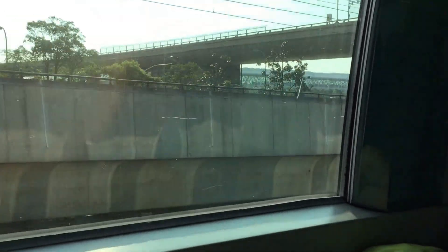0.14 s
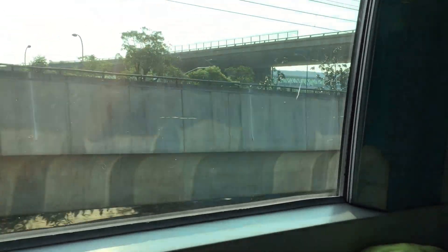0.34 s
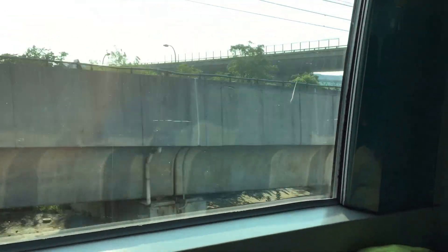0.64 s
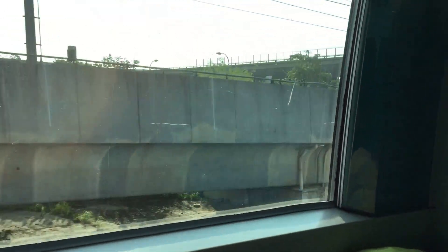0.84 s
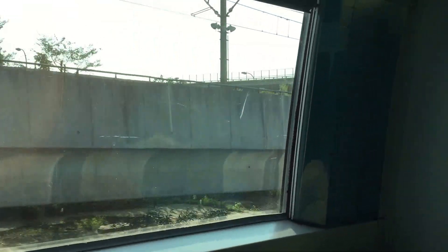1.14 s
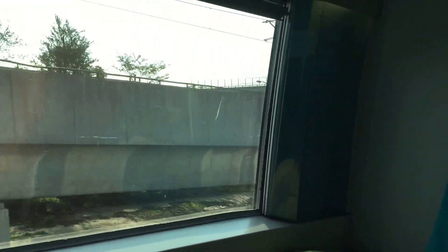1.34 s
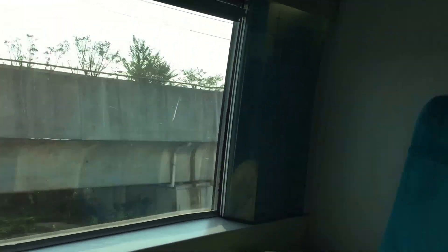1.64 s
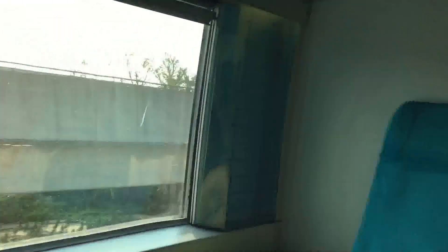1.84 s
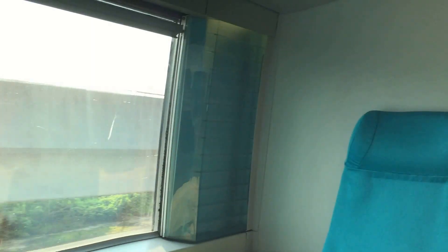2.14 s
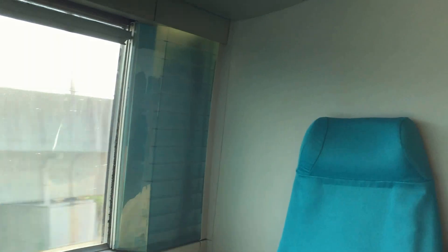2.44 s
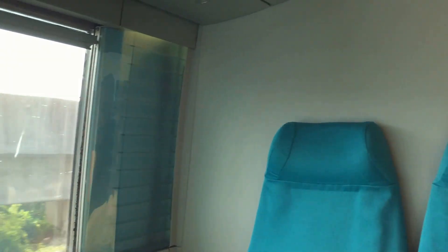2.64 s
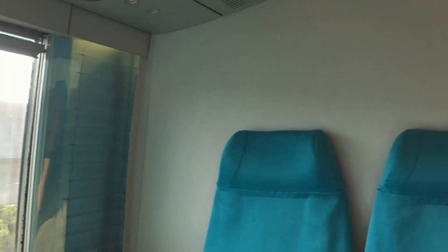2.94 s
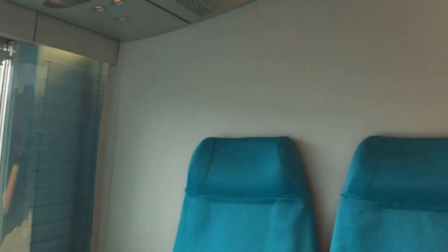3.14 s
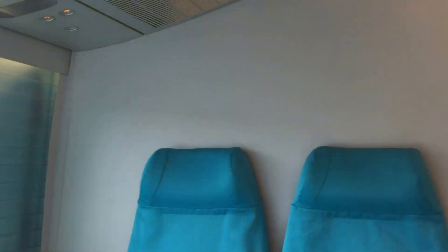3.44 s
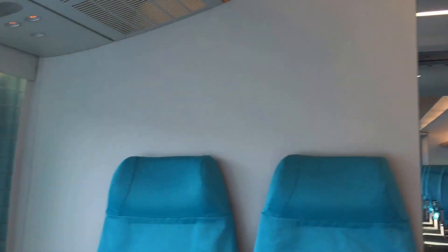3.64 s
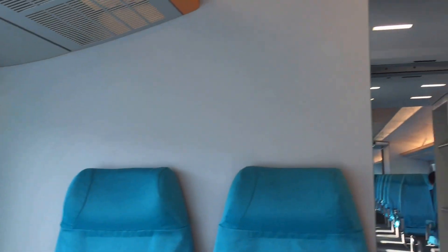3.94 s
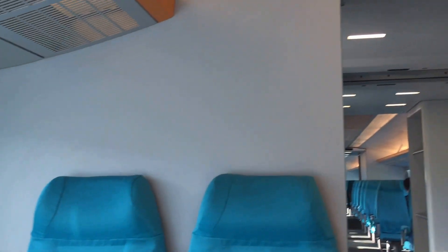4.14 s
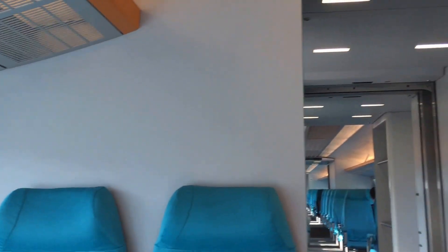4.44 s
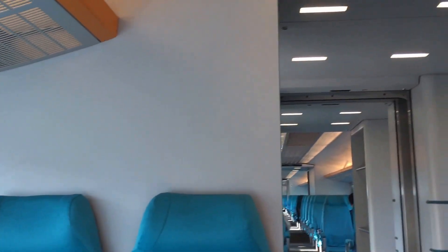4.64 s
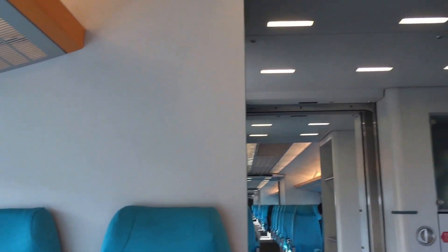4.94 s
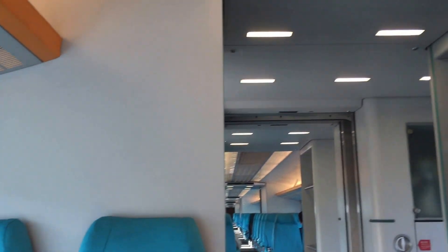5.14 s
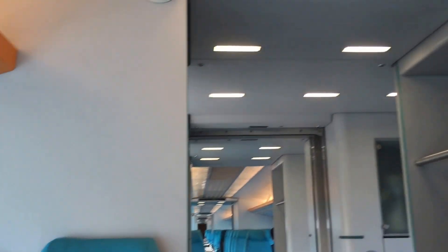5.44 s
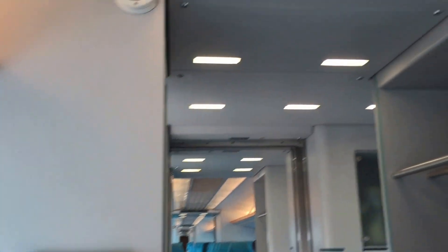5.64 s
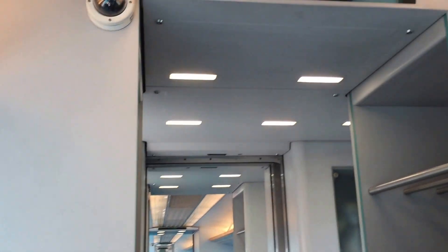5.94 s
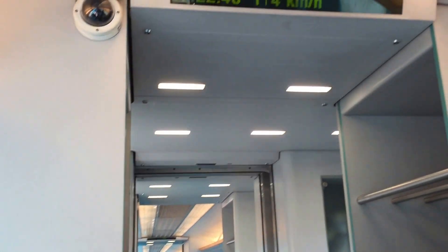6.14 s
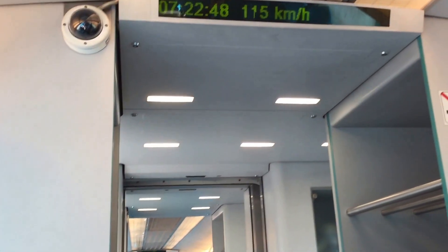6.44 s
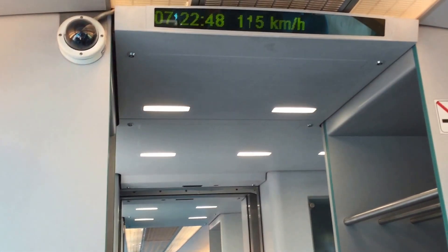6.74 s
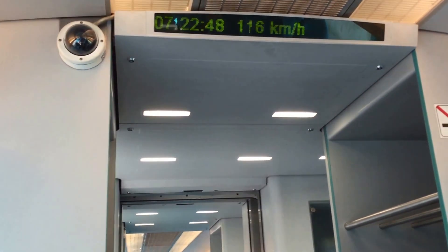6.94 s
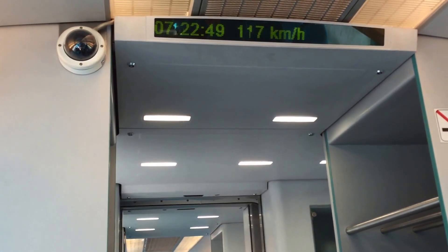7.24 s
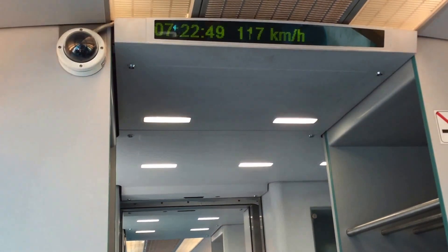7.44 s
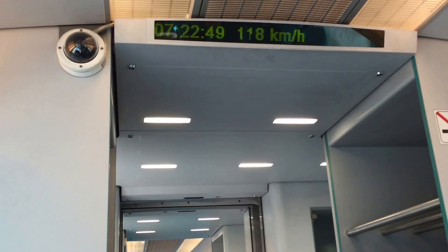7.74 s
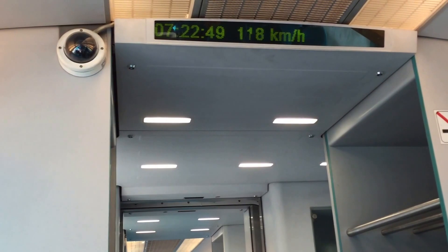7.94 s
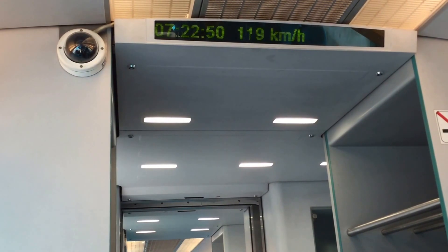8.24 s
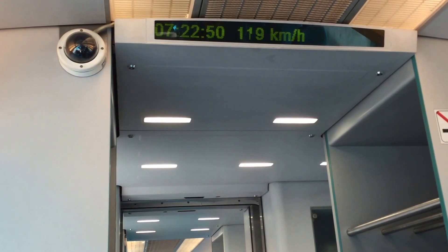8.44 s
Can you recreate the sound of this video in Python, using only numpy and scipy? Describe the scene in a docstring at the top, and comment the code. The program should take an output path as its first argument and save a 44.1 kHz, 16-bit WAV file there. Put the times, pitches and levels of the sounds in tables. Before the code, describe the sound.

Inside a fast train cabin, a steady low rumble and a slowly rising whine, with faint clicks and rattles from the trim.

```python
"""The motor of a magnetically levitated train whines as it gathers speed, heard inside the cabin.
The teeth of the track's motor winding pass under the magnets and make the whine; everything that
repeats along the track hums in step with the speed. The cabin's trim snaps, pings and rattles, and
something squeaks faintly. Behind it all are floor rumble, wall roar, air vents and a fan.
The tone changes slowly as a small microphone turns from the window to the aisle."""
import sys
import numpy as np
from scipy import signal
from scipy.fft import rfft, irfft
from scipy.io import wavfile
from scipy.ndimage import uniform_filter1d

SR = 44100
rng = np.random.default_rng(int(sys.argv[2]) if len(sys.argv) > 2 else 0)


def to_wav(sig):
    """Store sig (one row per channel, or 1-D mono) as 16-bit WAV at the path in sys.argv[1].

    Samples outside -1..1 are clipped; the rate is SR.
    """
    pcm = np.clip(np.atleast_2d(sig), -1, 1) * 32767
    pcm = np.round(pcm).astype(np.int16)
    wavfile.write(sys.argv[1], SR, pcm.T)  # frames by channels


N = 379260
T = np.arange(N) / SR

# How far the microphone has turned: time_s, turn_share (0 = window, 1 = aisle)
MIC_TURN = [(0, 0.06), (2.2, 0.24), (3.5, 0.6), (5.2, 0.74), (8.6, 0.92)]


def track_tones():
    """Passing motor teeth whine and the repeating track pattern hums; all pitches rise with the speed."""
    # A tone's "multiple" is its pitch divided by the rate at which the track pattern passes.
    # The whine swells and fades: time_s, tooth_tone_db, double_pitch_db, triple_pitch_db
    whine = [(0, -35, -60, -79), (.5, -36.5, -51.5, -83), (.65, -37.5, -52.5, -63), (.95, -37.5, -52, -64),
             (1.2, -33, -54, -69), (1.55, -39, -51.5, -72), (1.7, -36, -50.5, -61),
             (2.3, -36.5, -49.5, -68), (2.6, -39.5, -56, -65), (2.8, -39, -74, -61), (3.3, -50, -63, -66),
             (3.8, -46, -58.5, -66.5), (4.4, -38, -64, -60.5), (4.65, -35.5, -50.5, -72.5),
             (4.9, -36.5, -48, -61.5), (5.4, -37, -51.5, -80), (5.7, -43.5, -51, -74.5),
             (6.15, -52, -54.5, -68), (6.5, -39.5, -58, -62.5), (7.1, -47.5, -57.5, -59.5),
             (7.35, -41, -56.5, -63.5), (7.7, -42, -53.5, -67), (8.1, -50.5, -57.5, -64),
             (8.6, -45, -53.5, -64)]
    # Low hums that grow loud when their pitch meets a cabin resonance: multiple, base_level_db
    low_hums = [(11, -39.5), (15, -32), (21, -38), (24, -44.5)]
    # Resonances, the pitches at which the cabin booms: pitch_hz, width_hz, gain_db
    booms = [(112.6, 12, 0), (132, 13, -2), (138.1, 0.93, 2), (229.3, 7.1, -4)]
    # The deepest hums swell and sink: time_s, gain_db
    throb = [(0, 7.5), (.5, -3.5), (1.05, 4.5), (1.35, 6.5), (1.9, 0), (2.45, 6), (2.9, -1), (3.25, 9),
             (3.75, -13.5), (4.05, 11), (4.4, -1.5), (5.2, -10), (6.2, -0.5), (7.3, 0), (7.6, -7),
             (8.6, -12)]
    # Faint hums that come and go as girders pass: multiple, base_level_db
    faint_hums = [(3, -54.5), (6, -50.5), (9, -53), (16, -54), (30, -56), (32, -54), (34, -55.5)]
    # Hums that stand out for one stretch of track: multiple, start_s, end_s, level_db
    passing_hums = [(66, 0, .4, -54), (39, 0, 1, -53), (37, 0, 1.4, -49), (13, .2, .9, -33),
                    (56, .35, 4.6, -52), (144, 0, .35, -64), (13, 1.1, 2.5, -29), (22, 1.5, 2, -50),
                    (24, 1.8, 4.5, -56), (33, 2.2, 5.3, -53), (74, 2.4, 3.5, -57), (60, 2.5, 2.9, -55),
                    (18, 2.5, 7.1, -51), (69, 2.8, 3.5, -54), (66, 3, 3.9, -58), (13, 3.05, 4.3, -28),
                    (60, 3.1, 4.35, -49), (14, 2.35, 2.75, -33), (71, 3.1, 3.6, -58), (75, 3.3, 4.6, -56),
                    (11, 2.95, 4.5, -37), (21, 7.6, 8.6, -43), (24, 0, 1.4, -46), (109, 4.2, 4.7, -63),
                    (22, 4.25, 4.7, -47), (13, 4.3, 5, -33), (13, 5, 6.1, -36), (37, 4.3, 7, -49),
                    (12, 5, 6, -38), (27, 4.9, 8.5, -55), (70, 5.2, 6.4, -59), (48, 5.2, 7.5, -53),
                    (15, 5.5, 7.4, -43), (54, 5.9, 6.3, -54), (60, 5.8, 7.7, -61), (12, 6, 8, -33),
                    (102, 6.5, 7.5, -66), (13, 7, 7.5, -33), (46, 7.5, 8.2, -53), (51, 7.9, 8.6, -55),
                    (33, 7.9, 8.6, -51)]
    tooth_spacing_m, teeth_per_pattern = .086, 36
    start_m_per_s, off_boom_db, fade_s = 29.18, -17, .25
    t = T[::10]  # these tones are low, so a tenth of the sample rate is enough
    pull_m_per_s2 = np.interp(t, [0, 4.8], [.41, .592])  # the pull grows, then holds
    speed = start_m_per_s + np.cumsum(pull_m_per_s2) * 10 / SR
    pattern_hz = speed / (tooth_spacing_m * teeth_per_pattern)
    angle = 2 * np.pi * np.cumsum(pattern_hz) * 10 / SR
    turn, throb_db = curves(MIC_TURN, t)[0], curves(throb, t)[0]
    tones = []
    for k, db in enumerate(curves(whine, t), start=1):
        tones.append((teeth_per_pattern * k, gain_of(db) * wavering(rate_hz=6, steady=.88)))
    for multiple, db in low_hums:
        hz = multiple * pattern_hz
        peaks = sum(gain_of(d) / (1 + (2 * (hz - pitch) / width) ** 2) for pitch, width, d in booms)
        level = (gain_of(off_boom_db) + peaks) * gain_of(db + (multiple < 20) * throb_db)
        tones.append((multiple, level * wavering(rate_hz=5, steady=.89)))
    for multiple, db in faint_hums:
        level = gain_of(db + facing_db(multiple * pattern_hz, turn))
        tones.append((multiple, level * wavering(rate_hz=.79, steady=.37)))
    for multiple, start_s, end_s, db in passing_hums:
        fade = np.clip(np.minimum(t - start_s, end_s - t) / fade_s + .5, 0, 1)
        tones.append((multiple, gain_of(db) * fade * wavering(rate_hz=5, steady=.85)))
    out = np.zeros(len(t))
    for multiple, level in tones:
        phase = multiple * angle + 2 * np.pi * rng.random()
        out += (level * np.exp(1j * phase)).real
    return np.sqrt(2) * signal.resample_poly(out, 10, 1, window=("kaiser", 12))[:N]


def trim_snaps():
    """The trim cracks and slips again within milliseconds; a short cabin echo follows."""
    # Each snap (level over its first 10 ms; decay is the time to fall by 60 dB):
    # start_s, level_db, brightness_db_per_octave, decay_s, ring_hz, ring_db, body_ring_db
    snaps = [(1.4788, -51, -1.5, 0.061, 3700, 4, 2), (1.592, -53, 2, 0.066, 3700, 1, 8.5),
             (2.04, -78, 2, 0.1, 3540, 2, 4), (3.1555, -62, -6, 0.18, 3540, 6, 8.5),
             (3.188, -47.5, 2.5, 0.089, 5700, 5, 8.5), (3.256, -55.5, -5, 0.071, 2600, 3, 7.5),
             (3.702, -64, -6, .08, 6000, 2, 6), (3.714, -57, -8, 0.18, 6300, 10, 7),
             (3.777, -48.5, 1, 0.12, 7560, 3, 11), (4.4462, -52, -11, 0.05, 4950, 16, 2.5),
             (4.473, -60, -3, 0.11, 4110, -1, 10), (4.643, -65.5, 2, 0.09, 6540, 5, 9),
             (6.575, -58.5, -6.5, 0.12, 3500, 1.5, -12), (7.161, -65.5, -6, 0.093, 5850, 7, -2),
             (7.6123, -49, -3, 0.072, 3300, 2, -1), (8.082, -61.5, -9, 0.11, 6060, 9, 0)]
    # The tone colour all snaps start from: pitch_hz, gain_db
    snap_colour = [(500, -20), (900, -3), (1400, -1), (2200, 0), (3000, -3), (3700, -2), (4800, -6),
                   (6600, -2), (8200, -6), (11000, -10), (13000, -10), (15000, -12)]
    out, t = np.zeros(N), np.arange(16384) / SR
    hz = np.fft.rfftfreq(len(t), 1 / SR)
    for start_s, db, bright_db, decay_s, ring_hz, ring_db, body_db in snaps:
        jitter = rng.uniform(0, .64, 4) * (np.arange(4) > 0)
        slips_s = .0036 * (np.arange(4) + jitter)
        crack = sum(.65 ** k * (t >= s) * gain_of(-60 * np.maximum(t - s, 0) / .028)
                    for k, s in enumerate(slips_s))
        tail = gain_of(-60 * t / np.clip(decay_s, .04, .15)) + .4 * gain_of(-60 * t / .43)
        envelope = (crack + tail) * np.minimum(t / .003, 1) ** 2
        tilt = bright_db * np.log2(np.maximum(hz / 3000, 1))
        ring = ring_db / (1 + ((hz - ring_hz) / 350) ** 2)
        body = body_db / (1 + ((hz - 2250) / 770) ** 2)
        colour = gain_of(db_at(snap_colour, hz) + tilt + ring + body)
        sharp, dull = (irfft(rfft(rng.standard_normal(len(t))) * colour / (1 + (hz / cutoff_hz) ** 2))
                       for cutoff_hz in (40000, 11000))
        sharp *= gain_of(-60 * (t / .027) ** 2)  # the treble dies first
        dull *= 1 - gain_of(-60 * (t / .02) ** 2)
        burst = envelope * (sharp + dull)
        add(out, start_s, gain_of(db) * burst / np.std(burst[:SR // 100]))
    return out


def trim_pings(faint_count=260):
    """Small knocks make a panel ring briefly at one main pitch and two weaker ones."""
    # The loudest pings: start_s, level_db, pitch_hz
    loud_pings = [(0.232, -51.5, 2160), (0.586, -53, 2110), (1.077, -45.5, 1250), (1.28, -52, 2050),
                  (1.416, -52, 1830), (2.345, -51, 2000), (2.406, -61, 2980), (2.484, -50, 1340),
                  (2.595, -49, 1340), (4.066, -56, 1880), (4.229, -61, 3070), (6.356, -51.5, 2160),
                  (7.262, -59, 2350), (8.08, -60, 3060)]
    # How strong the faint, random pings tend to be: pitch_hz, base_level_db
    faint_levels = [(1100, -66.5), (1300, -52.5), (2000, -62), (2600, -63), (3300, -77.5), (4500, -85)]
    out, t = np.zeros(N), np.arange(3000) / SR
    when, pitch_share, softness = rng.random((faint_count, 3)).T
    faint_s = when * N / SR
    faint_hz = 1150 * (4300 / 1150) ** pitch_share
    faint_db = db_at(faint_levels, faint_hz) - 2.3 * np.log(softness + .046)
    faint_db -= 4 * curves(MIC_TURN, faint_s)[0]  # they come from the window side
    envelope = np.minimum(t / .0022, 1) * gain_of(-60 * t / .09)
    for start_s, db, hz in [*loud_pings, *zip(faint_s, faint_db, faint_hz)]:
        low_hz, high_hz = hz * rng.uniform([.6, 1.1], [.9, 1.4])
        weaker = np.sin(2 * np.pi * low_hz * t) + .5 * np.sin(2 * np.pi * high_hz * t)
        ring = np.sin(2 * np.pi * hz * t) + .41 * weaker
        add(out, start_s, gain_of(db) * envelope * ring)
    return out


def rattles(faint_count=14):
    """A loose part chatters in short bursts that make it ring; faint bursts come at random."""
    # The clearer rattles, thickest in the first second: start_s, level_db
    clear_rattles = [(0.0572, -58), (0.124, -65), (0.14, -75), (0.203, -65), (0.2313, -61), (0.3076, -64),
                     (0.4149, -70), (0.4787, -68), (0.586, -59), (0.6523, -64), (0.668, -62.5),
                     (0.7526, -64), (0.765, -65), (0.835, -67), (0.9696, -66), (1.003, -64), (1.017, -64),
                     (1.1158, -71), (1.2794, -68), (1.3577, -62), (1.4246, -64), (1.9329, -65.5),
                     (2.1803, -63), (2.3485, -64), (2.4078, -64), (2.4794, -63), (2.7261, -62),
                     (3.8885, -64), (4.2394, -72), (4.416, -59), (4.432, -65), (4.9794, -67), (5.75, -63),
                     (6.3479, -63), (6.781, -63.5), (6.887, -60.5), (8.1777, -59.5)]
    # The pitches at which the loose part rings: pitch_hz, width_hz, gain_db
    resonances = [(2100, 340, 9.5), (3220, 350, 2), (4000, 300, -9.5), (4650, 300, -7.5), (5500, 300, -1),
                  (5830, 300, -0.5), (6430, 410, -3.5), (6800, 350, -3.5)]
    rise_s, faint_db, dulling_db = .0052, -70, -7.5
    out, t = np.zeros(N), np.arange(4096) / SR
    hz = np.fft.rfftfreq(len(t), 1 / SR)
    envelope = t / rise_s * np.exp(1 - t / rise_s)
    when, size = rng.random((faint_count, 2)).T
    for start_s, db in [*clear_rattles, *zip(when * N / SR, faint_db + 6 * (size - .5))]:
        ring = sum(gain_of(d + 1.5 * rng.standard_normal()) / (1 + 2j * (hz - pitch) / width) ** 2
                   for pitch, width, d in resonances)
        # treble is lost as the microphone turns away
        ring *= gain_of(dulling_db * curves(MIC_TURN, start_s)[0] * np.clip(hz / 5000, 0, 1) ** 2)
        chatter = unit_level(irfft(rfft(rng.standard_normal(len(t))) * ring))
        add(out, start_s, gain_of(db) * envelope * chatter)
    return out


def squeaks():
    """A thin, high, slightly rough tone slides up, then down."""
    # The two strokes of the squeak: start_s, length_s, first_hz, last_hz, level_db
    strokes = [(5.05, 0.099, 11650, 12100, -88), (5.23, .07, 11500, 11150, -88)]
    out = np.zeros(N)
    for start_s, length_s, first_hz, last_hz, db in strokes:
        glide_hz = np.linspace(first_hz, last_hz, round(length_s * SR))
        wobble_hz = 60 * unit_level(uniform_filter1d(rng.standard_normal(8192), size=150))
        tone = np.sqrt(2) * np.sin(2 * np.pi * np.cumsum(glide_hz + wobble_hz[:len(glide_hz)]) / SR)
        add(out, start_s, gain_of(db) * tone * signal.windows.tukey(len(tone), .4))
    return out


def cabin_noise():
    """The floor rumbles, a roar comes through the walls and the air vents hiss."""
    # How loud each noise is: time_s, rumble_db, roar_db, air_db
    levels = [(0, -26.5, -40.5, -56.5), (1.3, -30, -41.5, -57), (2.5, -30, -41.5, -56),
              (3.4, -32, -42.5, -57), (4.4, -31.5, -40.5, -56), (5.5, -30, -40.5, -56.5),
              (5.8, -30, -40.5, -56), (6.8, -30, -39.5, -57), (7.3, -33, -40, -55.5),
              (7.95, -29, -39.5, -56.5), (8.6, -31.5, -39.5, -55.5)]
    # The tone colours of floor, walls and vents, each: pitch_hz, gain_db
    floor_colour = [(15, -39), (25, -19), (35, -25.5), (45, -6.5), (66, 2), (96, 0), (110, 2), (126, -2),
                    (146, -2.5), (177, -17), (230, -13.5), (400, -38.5), (800, -83)]
    wall_colour = [(100, -11.5), (170, 10), (227, 6.5), (288, 6.5), (389, 4), (510, 1.5), (672, -0.5),
                   (740, -5.5), (800, -8), (1066, -30.5), (1300, -41), (2000, -49), (4000, -80)]
    vent_colour = [(500, -22), (1000, 5), (1300, -1), (1600, -5.5), (2000, -4.5), (2300, -6.5), (2700, -13),
                   (3300, -18), (4000, -19), (4800, -30), (5500, -26.5), (7000, -30.5), (9000, -35.5),
                   (14500, -49)]
    rumble_db, roar_db, air_db = curves(levels, T)
    rumble = gain_of(rumble_db) * noise(floor_colour, size=8192, patchy_db=1.2, flicker_db=.4)
    roar = gain_of(roar_db) * noise(wall_colour, size=2048, patchy_db=.8, flicker_db=.1)
    air = gain_of(air_db) * noise(vent_colour, size=512, patchy_db=2, flicker_db=-.14)
    return rumble + roar + air


def fan(pitch_hz=1404):
    """A fan sings one faint, slightly unsteady tone."""
    # How loud the fan is: time_s, level_db
    levels = [(0, -69.5), (1.25, -67.5), (1.8, -76), (5.3, -73.5), (5.9, -65.5), (8.6, -68.5)]
    waver = np.interp(T, T[::10], wavering(rate_hz=4, steady=.8))
    tone = np.sqrt(2) * (waver * np.exp(2j * np.pi * pitch_hz * T)).real
    return gain_of(curves(levels, T)[0]) * tone


def facing_db(hz, turn):
    """How much louder or softer each pitch gets as the microphone turns."""
    # The change when fully turned to the aisle: pitch_hz, gain_db
    aisle = [(35, 1.5), (60, 4), (90, -3.5), (130, 2), (200, 2), (260, -1), (400, -0.5), (460, -1.5),
             (510, 8), (560, 0), (650, -2), (900, 5), (1150, 2), (1600, 4), (2100, -2), (3000, 1.5),
             (6000, 1), (12000, -0.5)]
    # The extra change half-way, facing the end wall behind the seats: pitch_hz, gain_db
    end_wall = [(130, 1), (260, 0), (450, 4.5), (580, 2.5), (700, 9.5), (850, 0.5), (2000, 0.5)]
    return db_at(aisle, hz) * turn + db_at(end_wall, hz) * np.sin(np.pi * turn) ** 2


def noise(colour, size, patchy_db, flicker_db, turns=True):
    """Noise in frames of `size` samples: patches of pitch swell and sink, and the whole level flickers."""
    frames, hz = 4 * N // size + 5, np.fft.rfftfreq(size, 1 / SR)
    real, imag, patches = rng.standard_normal((frames, len(hz), 3)).T
    patches = unit_level(uniform_filter1d(uniform_filter1d(patches, size=12, axis=0), size=10, axis=1))
    flicker = unit_level(uniform_filter1d(rng.standard_normal(frames), size=5))
    turn = curves(MIC_TURN, np.arange(frames) * size / 4 / SR)[0]
    colour_db = db_at(colour, hz)[:, None] + turns * facing_db(hz[:, None], turn)
    spectra = (real + 1j * imag) * gain_of(colour_db + patchy_db * patches + flicker_db * flicker)
    return unit_level(signal.istft(spectra, nperseg=size, noverlap=3 * size // 4)[1][:N])


def wavering(rate_hz, steady):
    """A gain for every tenth sample: a steady share plus a part that drifts in size and phase."""
    t = np.arange(0, N / SR + 1, 1 / 50)
    span = max(round(25 / rate_hz), 1)
    real, imag = uniform_filter1d(uniform_filter1d(rng.standard_normal((2, len(t))), span), span)
    drift = unit_level(real + 1j * imag)
    return np.interp(T[::10], t, np.sqrt(steady) + np.sqrt(1 - steady) * drift)


def gain_of(db):
    """Turns decibels into a number to multiply by."""
    return 10 ** (np.asarray(db) / 20)


def unit_level(x):
    """Scales a signal to an average (rms) level of 1."""
    return x / np.sqrt(np.mean(np.abs(x) ** 2) + 1e-20)


def db_at(table, hz):
    """Looks up decibels by pitch, with every octave equally wide."""
    pitches, db = np.transpose(table)
    return np.interp(np.log(hz + 1), np.log(pitches + 1), db)


def curves(table, t):
    """Looks up each column of a time table at the times t."""
    times, *columns = np.transpose(table)
    return [np.interp(t, times, column) for column in columns]


def add(mix, start_s, sound):
    """Mixes a sound in at its start time."""
    part = mix[round(start_s * SR):][:len(sound)]
    part += sound[:len(part)]


def scene():
    """All sources reach one microphone."""
    return (track_tones() + cabin_noise() + fan() + trim_snaps() + rattles() + trim_pings() + squeaks())[None]


def record(dry):
    """The microphone adds its own hiss, and the highest treble is cut off."""
    # The tone colour of that hiss: pitch_hz, gain_db
    hiss_colour = [(2000, -20), (4000, -1.5), (5000, -4), (7000, -9), (9500, -7), (10500, -13.5),
                   (11500, -8.5), (14500, -11.5)]
    hiss_db, cutoff_hz = -78.5, 15330
    hiss = gain_of(hiss_db) * noise(hiss_colour, size=512, patchy_db=2, flicker_db=.5, turns=False)
    low_pass = signal.firwin(1023, cutoff_hz, window=("kaiser", 5), fs=SR)
    return signal.oaconvolve(dry + hiss, low_pass[None], "same")


dry = scene()
out = record(dry)
to_wav(out)
```